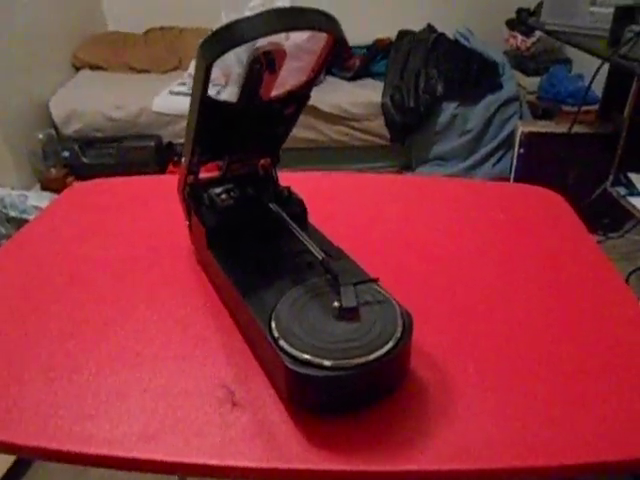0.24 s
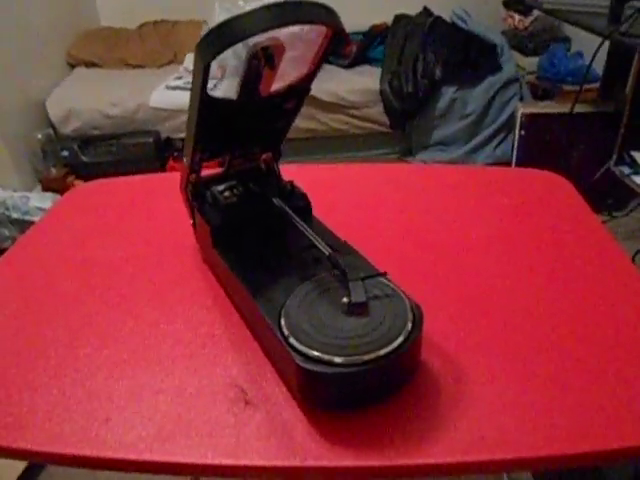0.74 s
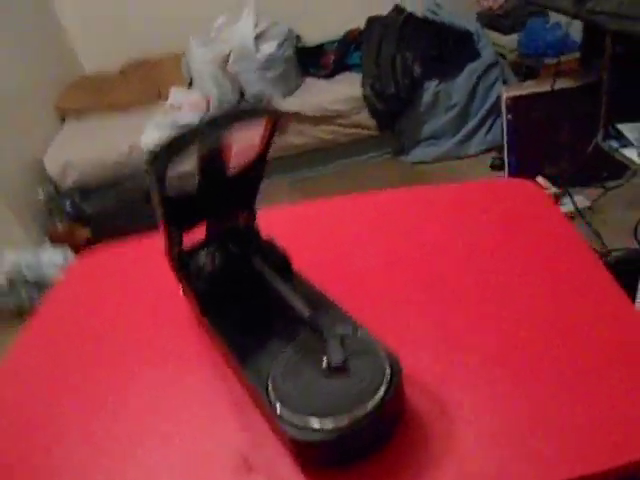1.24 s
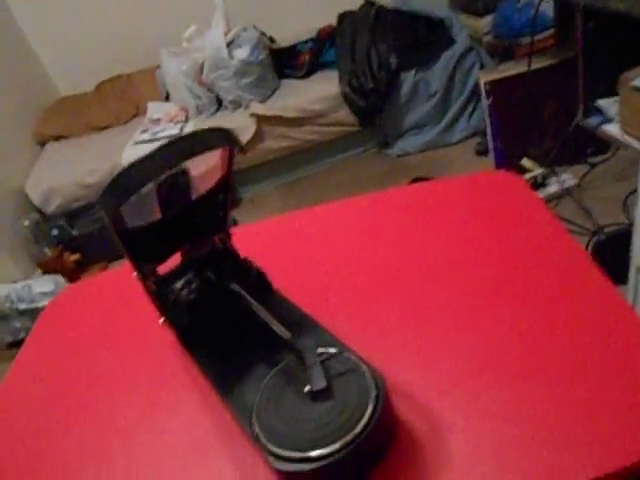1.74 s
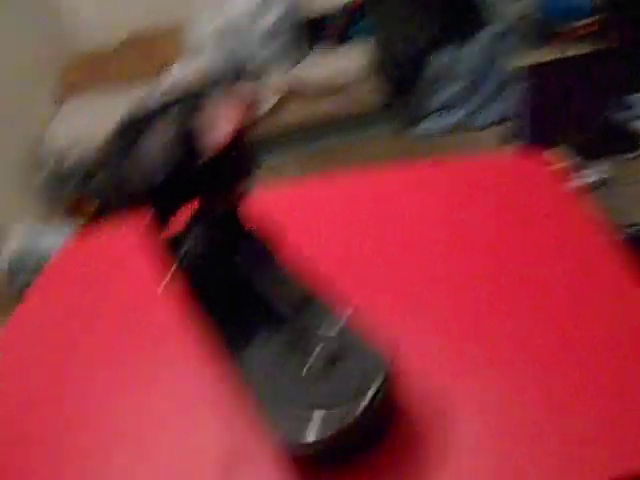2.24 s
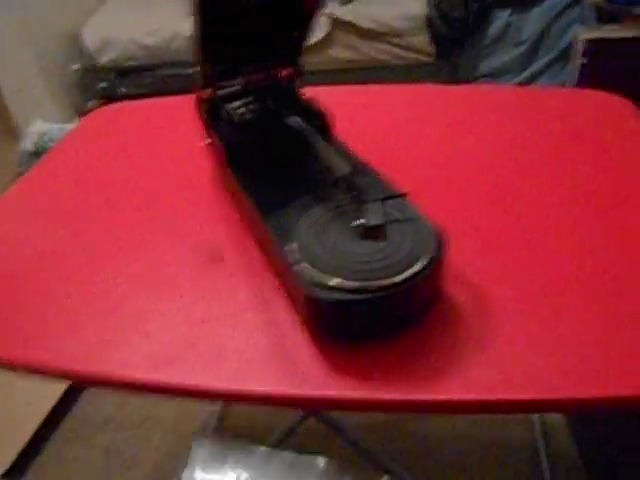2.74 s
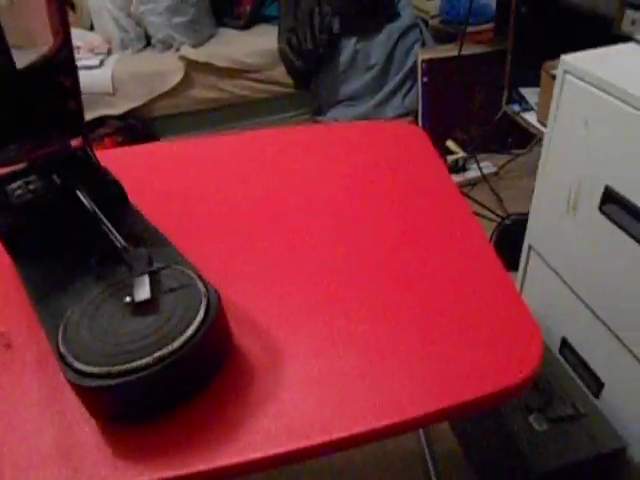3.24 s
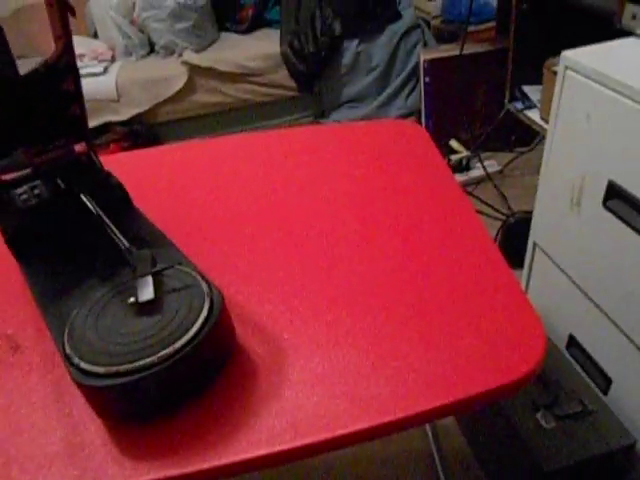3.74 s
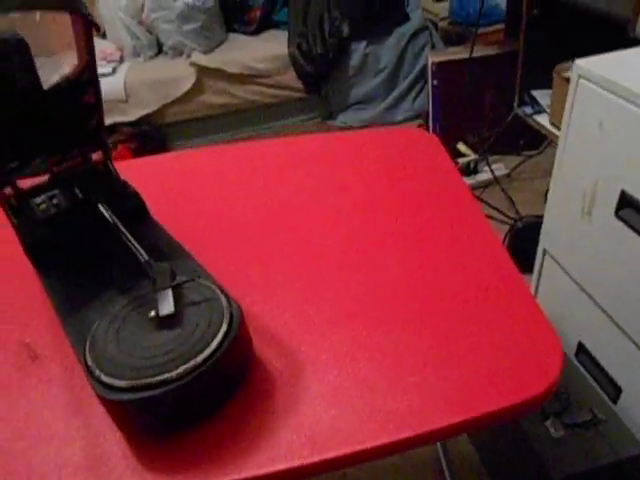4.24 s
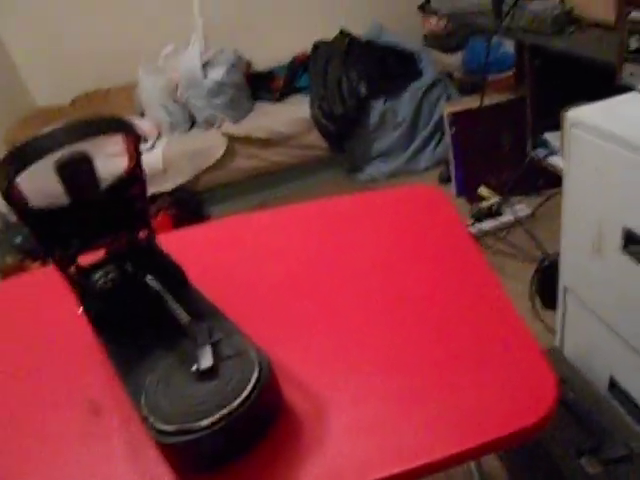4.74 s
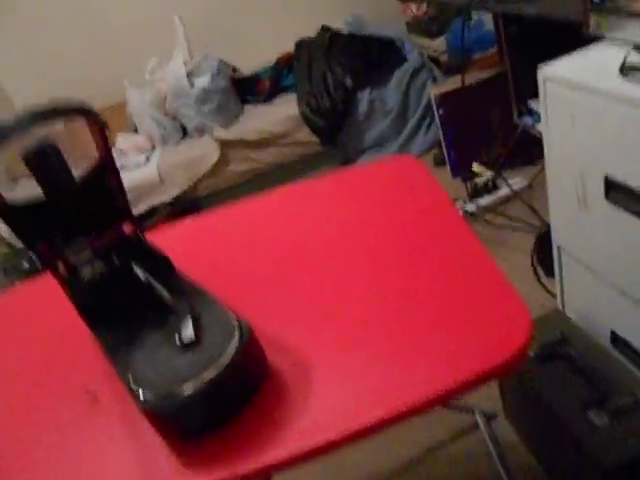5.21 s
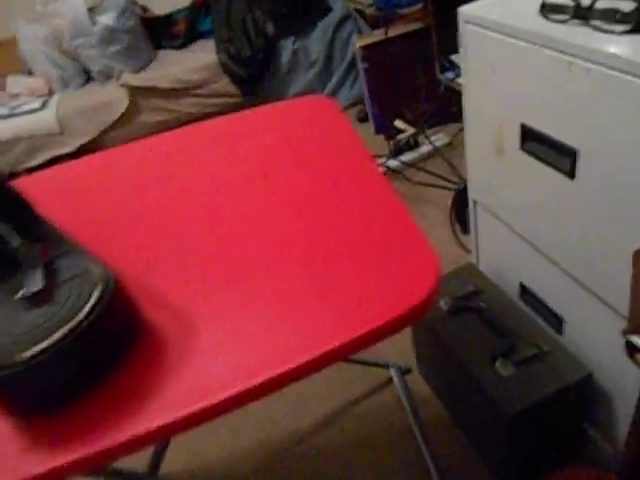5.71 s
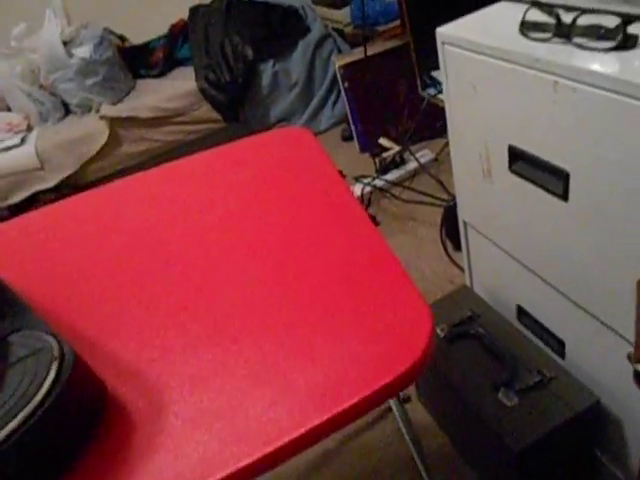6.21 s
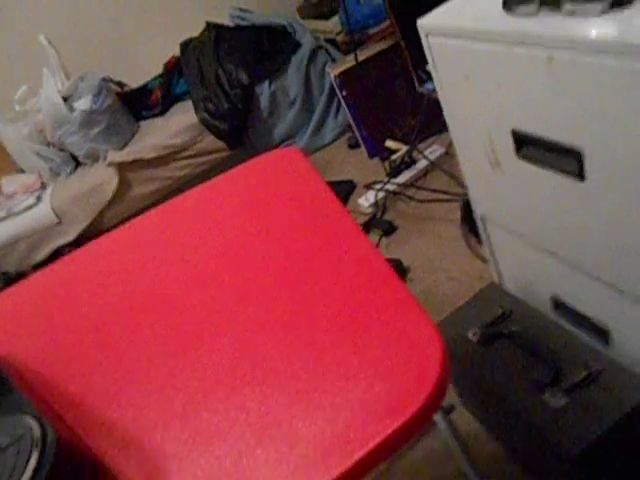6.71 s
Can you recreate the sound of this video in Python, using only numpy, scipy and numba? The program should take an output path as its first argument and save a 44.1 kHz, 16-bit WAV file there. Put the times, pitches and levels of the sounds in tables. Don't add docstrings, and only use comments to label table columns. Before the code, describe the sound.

Dry papery rubbing and crease ticks, a sharp burst of hollow table knocks, then a long swelling swish and scattered bumps in a hissy room.

```python
import sys
import numpy as np
from scipy import signal
from scipy.fft import rfft, irfft, next_fast_len
from scipy.io import wavfile
from scipy.ndimage import uniform_filter1d
from numba import njit

SR = 44100
rng = np.random.default_rng(int(sys.argv[2]) if len(sys.argv) > 2 else 0)


def nominal_scale(level):
    x = np.asarray(level, float) / 20
    return 10 ** x


def persist_wave(psi):
    counts = np.round(np.clip(psi, -1, 1) * 32767).astype(np.int16)
    wavfile.write(sys.argv[1], SR, np.atleast_2d(counts).T)


N = 307377
TIME = np.arange(N) / SR
SLOW = TIME[::32]


def unit(x):
    return x / np.sqrt(np.mean(x ** 2))


def noise():
    return rng.standard_normal(N)


def fade(t, t60):
    return nominal_scale(-60 * t / t60)


def colour(x, points):
    hz, db = np.transpose(points)
    size = next_fast_len(len(x))
    log_hz = np.log(np.arange(1, size // 2 + 2) * SR / size)
    gain = nominal_scale(np.interp(log_hz, np.log(hz), db))
    return irfft(rfft(x, size) * gain, size)[:len(x)]


def band(x, lo_hz, hi_hz):
    edges_hz = [lo_hz, min(hi_hz, SR / 2.2)]
    return signal.sosfilt(signal.butter(2, edges_hz, "band", fs=SR, output="sos"), x)


@njit
def hollow(x, hz, share):
    out, band_state, low_state = np.empty(len(x)), 0., 0.
    for i in range(len(x)):
        g = np.tan(np.pi * hz[i] / SR)
        v = (band_state + g * (x[i] - low_state)) / (1 + g * (g + share))
        band_state = 2 * v - band_state
        low_state = low_state + 2 * g * v
        out[i] = share * v
    return out


def walk(rate):
    hold = int(len(SLOW) / TIME[-1] / rate)
    held = rng.standard_normal(N // 64)[np.arange(len(SLOW)) // hold]
    smooth = uniform_filter1d(uniform_filter1d(held, hold), hold)
    return np.interp(TIME, SLOW, unit(smooth))


def ring(modes):
    t = TIME[:SR // 2]
    y = sum(nominal_scale(db - 60 * t / t60) * np.sin(2 * np.pi * hz * t) for hz, db, t60 in modes)
    return y / np.abs(y).max()


def rattle(lo_hz, hi_hz, t60):
    t = TIME[:SR // 2]
    return unit(band(rng.standard_normal(len(t)), lo_hz, hi_hz)) * fade(t, t60)


def fibres(share, scatter_db):
    slips = rng.random(N) < share
    size_db = scatter_db * np.minimum(rng.exponential(size=N), 4.)
    return slips * rng.standard_normal(N) * nominal_scale(size_db)


def strike(s, db, body):
    blows = np.zeros(N)
    blows[(np.asarray(s) * SR).astype(int)] = nominal_scale(np.asarray(db))
    return signal.oaconvolve(blows, body)[:N]


def taps(table, t60, snap_db, snap_t60, top_hz):
    out, t = np.zeros(N + 4096), TIME[:4096]
    grits = rng.standard_normal((len(table), len(t)))
    for (s, db, hz), grit in zip(table, grits):
        tone = np.sin(2 * np.pi * hz * t) * fade(t, t60)
        snap = grit * (fade(t, snap_t60) + nominal_scale(-18 - 60 * t / 0.038))
        click = nominal_scale(snap_db) * band(snap, hz / 3.5, min(3.2 * hz, top_hz))
        out[int(s * SR):][:len(t)] += nominal_scale(db) * (tone + click)
    return out[:N]


def peak(s, rise_s, fall_s, rise_db, bend):
    before = np.maximum(s - SLOW, 0) / rise_s
    after = np.maximum(SLOW - s, 0) / fall_s
    return nominal_scale(np.maximum(-rise_db * before ** bend - 20 * after, -120))


# pitch_hz [Hz], level_db [dB]
ROOM_HISS = [(47, -39), (80, -8.5), (120, 2.5), (330, -11.5), (561, -1.5), (787, -2), (1650, -7),
             (2420, -6.5), (4100, -10), (8080, -10.5), (10200, -13), (11800, -14.5), (12600, -48.5),
             (16400, -79), (22000, -120)]
# pitch_hz [Hz], level_db [dB]
MAINS_HUM = [(118.4, -60), (237, -64.5)]
# time_s [s], gain_db [dB]
CAMERA_GAIN = [(0, 2), (.08, -2), (.11, 3), (1.13, 5.5), (1.2, -3), (1.3, 2), (1.8, 5.5), (2.3, 1.5),
               (2.6, 4.5), (2.66, 2), (2.72, -2), (2.76, 3), (3.08, 0.5), (3.32, 1.5), (4.3, 5), (4.65, 4),
               (4.735, 1), (4.77, 4), (5.22, 2.5), (5.25, 0), (5.34, -.5), (5.4, 3), (5.6, 6.5),
               (6.97, 3.5)]


def room():
    hiss = unit(colour(noise(), ROOM_HISS)) * nominal_scale(-52)
    hum = sum(nominal_scale(db + 1 + 0.6 * walk(1.893)) * np.sin(2 * np.pi * hz * TIME) for hz, db in MAINS_HUM)
    s, gain_db = np.transpose(CAMERA_GAIN)
    return (hiss + hum) * nominal_scale(np.interp(TIME, s, gain_db))


# peak_s [s], rumble_db [dB], thud_db [dB]
HAND_JOLTS = [(0.02, -45, -46), (0.23, -28, -31), (0.43, -37, -39.5), (0.68, -39, -47.5),
              (0.92, -41, -44.5), (1.14, -40, -48.5), (1.38, -43, -51), (1.55, -50, -41.5),
              (1.71, -40.5, -38), (2.52, -31, -43), (2.78, -34, -40), (2.95, -46.5, -53), (3.51, -31, -43),
              (3.69, -37, -41.5), (3.92, -41.5, -44.5), (4.07, -41, -45), (4.15, -42, -39),
              (4.21, -28, -33), (5.49, -39.5, -39.5), (6.49, -40, -42), (6.66, -41, -50),
              (6.85, -48.5, -47)]
# start_s [s], end_s [s], pitch_hz [Hz], first_db [dB], last_db [dB]
HUM_SPELLS = [
    (4.9, 5.4, 31, -45.5, -52),
    (5.55, 6.5, 37, -47, -44),
    (1.4, 2.78, 171, -60, -49),
]
# start_s [s], level_db [dB], pitch_hz [Hz]
CAMERA_LURCHES = [
    (2.755, -19, 36),
    (2.515, -22, 110),
    (3.51, -21, 62),
    (2.77, -27, 105),
    (2.83, -31, 120),
]


def grip():
    shake, squeeze = nominal_scale(-56), nominal_scale(-56)
    for s, rumble_db, thud_db in HAND_JOLTS:
        jolt = peak(s, 0.0833, 0.1099, 20.25, 0.9)
        shake = shake + jolt * nominal_scale(rumble_db)
        squeeze = squeeze + jolt * nominal_scale(thud_db)
    rumble = unit(band(noise(), 11.5, 56)) * np.interp(TIME, SLOW, shake) * nominal_scale(1.11 * walk(12))
    thud = unit(band(fibres(.02, 1.85), 98, 493)) * np.interp(TIME, SLOW, squeeze) * nominal_scale(2.47 * walk(25))
    sway = unit(band(noise(), 4, 19)) * nominal_scale(-47 + 3.4 * walk(3))
    drone = 0
    for start_s, end_s, hz, first_db, last_db in HUM_SPELLS:
        level = nominal_scale(np.interp(TIME, [start_s, end_s], [first_db, last_db]))
        spell = uniform_filter1d((TIME > start_s) * (TIME < end_s) * level, size=6000)
        tone = np.sin(2 * np.pi * np.cumsum(hz + 2.5 * walk(8)) / SR)
        drone = drone + np.sqrt(2) * spell * nominal_scale(2.5 * walk(14)) * tone
    return rumble + thud + sway + drone + taps(CAMERA_LURCHES, 0.13, -40, 0.03, 1800)


def afterring():
    s, blow_db, panel_db, _ = np.transpose(TABLE_KNOCKS)
    hit_db = blow_db + panel_db
    t = TIME[:SR // 2]
    crack = unit(band(noise(), 1500, 4200)) * strike(s, hit_db - 25, fade(t, .06))
    wash = unit(colour(noise(), [(200, -12), (700, 0), (2000, -1), (4000, -10), (10000, -16)]))
    wash = wash * strike(s, hit_db - 31, fade(t, .36) * (1 - np.exp(-t / .006)))
    song_s, song_db = np.transpose(FRAME_SONGS)
    shimmer = unit(band(noise(), 6900, 8000))
    shimmer = shimmer * strike(song_s, song_db - 9, fade(t, .25) * (1 - np.exp(-t / .012)))
    return crack + wash + shimmer


# start_s [s], blow_db [dB], panel_db [dB re blow], edge_db [dB re blow]
TABLE_KNOCKS = [(0.886, -10, -1, -5), (2.409, -29, 3, -17.5), (2.496, -22, 1, -12), (2.5076, -12, 3, 5),
                (2.5195, -6.5, -17.5, -13.5), (2.533, -12, -22, 2), (2.5435, -14, -28, -18),
                (2.552, -13, -28, -18), (2.573, -20, -25, -18), (2.59, -24, -22, -18), (3.128, -17, 3, -11),
                (3.152, -19.5, -0.5, -11), (3.169, -25, 2, -14), (3.183, -24, 2, -16),
                (3.1965, -23, 1, -14), (3.214, -26, 0, -20), (3.267, -36, 4, -8), (3.234, -20, -2, -17.5),
                (3.474, -19, -6, -19), (3.502, -25.5, -8, -8), (3.682, -23.5, -0.5, -15.5),
                (4.294, -22.5, 2, -4.5), (4.745, -19.5, 4.5, -15), (5.365, -21, 1.5, -22),
                (5.673, -18.5, -1, -12.5), (5.698, -20, 0, -22.5), (5.727, -18, -0.5, -25.5),
                (6.079, -14, 4, -14.5), (6.117, -16.5, 2, -12), (6.195, -14.5, 2, -25),
                (6.954, -19.5, 0, -10.5)]
# start_s [s], level_db [dB]
FRAME_SONGS = [
    (3.128, -28.5),
    (4.746, -27),
    (5.366, -40.5),
    (6.079, -36),
    (6.196, -36),
]
# pitch_hz [Hz], level_db [dB], t60_s [s]
BOARD_TONES = [(237.1, 7.5, 0.0645), (290, -2, 0.107), (181.6, -12, 0.081), (447, -5, 0.0247)]
PANEL_TONES = [(584, 12.5, 0.046), (669, 0, 0.199), (739, 8, 0.0533), (846, 7.5, 0.0685),
               (1064.4, 1, 0.169), (1172.3, 2.5, .1), (2015, -15.5, 0.074)]
STEEL_TONES = [(7106, 0, .5), (7198, -4, .35), (7241, -3, .3), (7456, -1, .2), (7610, -3, .12),
               (7900, -6, .12), (4850, -8, .12), (8600, -8, .1), (6450, -8, .12)]
THOCK_TONES = [(660, 0, .03), (960, -2, .03), (1270, -5, .028), (1620, -9, .024), (2150, -9, .022)]


def knocks():
    s, blow_db, panel_db, edge_db = np.transpose(TABLE_KNOCKS)
    hit_db = blow_db + panel_db
    t = TIME[:SR // 2]
    push = 1 - np.exp(-t / 0.000965)
    board = strike(s, blow_db, push * (ring(BOARD_TONES) + nominal_scale(-21) * rattle(138.5, 380, 0.123)))
    panel_rattle = band(rattle(500, 1300, 0.09), 400, 1400)
    panel = strike(s, hit_db, nominal_scale(-2.5) * push * (ring(PANEL_TONES) + nominal_scale(-24) * panel_rattle))
    slap = unit(band(noise(), 900, 2400)) * strike(s, hit_db - 17, push * fade(t, .09))
    thock = strike(s, hit_db + .7, push * ring(THOCK_TONES))
    edge = unit(band(noise(), 2190, 6500)) * strike(s, blow_db + edge_db - 10, fade(t, .0195))
    loose = unit(colour(fibres(.2, 2.14), [(150, -3), (600, 2), (1200, -3.5), (2500, -16), (9000, -21)]))
    tail = loose * strike(s, blow_db - 19 + 0.7 * panel_db, push * fade(t, 0.255))
    steel = strike(*np.transpose(FRAME_SONGS), ring(STEEL_TONES) * (1 - np.exp(-t / 0.0088)))
    return band(board + panel + thock + slap + edge + tail + steel, 103.3, 11800)


# start_s [s], level_db [dB], pitch_hz [Hz]
FINGER_PATS = [(0.216, -22, 800), (0.227, -14.5, 519), (2.521, -13, 380), (0.331, -22, 1307),
               (.243, -19, 1100), (1.133, -25, 800), (1.397, -30, 433), (1.548, -26, 500),
               (1.693, -25.5, 559), (2.143, -29, 551), (2.65, -38, 762), (2.779, -27, 349),
               (2.82, -29, 668), (3.756, -27.5, 701), (4.179, -35, 706), (4.225, -15, 533),
               (4.255, -22, 665), (4.17, -24, 1550), (2.412, -24, 340), (2.427, -26, 330),
               (2.144, -33, 1020), (1.567, -33, 720), (1.708, -30, 600), (4.313, -30, 587),
               (4.295, -22, 700), (5.483, -26, 620), (5.491, -19, 650), (5.51, -28, 720), (5.385, -29, 792),
               (5.42, -31.5, 896), (2.41, -30.5, 598.5), (4.79, -33, 695), (4.83, -35, 792),
               (6.486, -28, 420), (6.495, -29, 480), (6.455, -33, 700), (3.49, -27, 1050),
               (6.862, -36, 550), (3.341, -33, 900), (3.444, -31, 450), (6.822, -34, 330)]


def pats():
    return taps(FINGER_PATS, 0.0396, 2.12, 0.0362, 1740)


# start_s [s], level_db [dB], pitch_hz [Hz]
PAPER_FLECKS = [(2.5078, -9, 8600), (.225, -13, 6000), (.129, -20, 10500), (.4478, -17, 7000),
                (6.117, -27, 8000), (3.1495, -30, 6400), (.327, -21, 6500), (.2415, -13, 8500),
                (.186, -17, 9000), (.157, -21, 8500), (.6429, -19, 8560), (1.045, -15, 4800),
                (2.552, -22, 9500), (2.563, -22, 8000), (2.6045, -23, 9810), (2.707, -37, 9000),
                (2.7621, -27, 8450), (2.797, -25, 4520), (2.8315, -27, 6000), (2.848, -26, 7500),
                (2.8769, -29, 9810), (3.2105, -32, 5000), (3.258, -33, 4100), (3.3388, -35, 8630),
                (3.5778, -30, 9620), (3.585, -33, 9500), (4.5291, -34, 9560), (4.864, -36, 9500),
                (4.965, -37, 5000), (5.09, -36, 9500), (5.1332, -33, 6000), (5.1627, -31, 5000),
                (5.206, -37, 8000), (5.226, -37, 9000), (5.279, -39, 6000), (5.5413, -33, 8000),
                (5.6161, -35, 5450), (5.667, -29, 8000), (5.7418, -31, 4770), (6.15, -32, 8500),
                (6.17, -33, 8500), (6.184, -31, 9000), (6.222, -33, 7500), (6.4423, -30, 4450),
                (6.513, -26, 3000)]


def flecks():
    return taps(PAPER_FLECKS, .003, 0., .003, 11000)


# start_s [s], level_db [dB], pitch_hz [Hz]
CREASE_TICKS = [(0.0155, -9, 2610), (0.2407, -9, 4300), (0.3252, -12, 2240), (0.4243, -7, 7550),
                (0.4472, -10, 1950), (1.1335, -14, 6500), (0.5278, -18, 2490), (0.5511, -18, 3010),
                (1.0246, -17, 5080), (1.0384, -14, 4350), (1.0527, -11, 5130), (1.0776, -16, 3730),
                (1.131, -4.5, 4755), (1.4267, -19.5, 6980), (1.548, -20, 2400), (1.6545, -13, 9000),
                (2.5083, 2, 3258), (2.535, -12, 3350), (2.563, -28, 5600), (2.5964, -28, 4320),
                (2.6045, -27, 4500), (2.8108, -27, 5400), (3.1276, -22.5, 3300), (3.5775, -32.5, 8070),
                (3.743, -31.5, 1900), (4.2233, -15, 8750), (4.371, -30, 2340), (5.658, -31, 7800),
                (5.761, -25, 8930), (6.795, -32.5, 4540)]


def creases():
    return taps(CREASE_TICKS, 0.00521, -2.05, 0.00336, 11500)


# start_s [s], level_db [dB], centre_hz [Hz], length_s [s], width
EDGE_SKIDS = [(0.539, -17.5, 2950, 0.0138, 1), (2.508, -1, 3400, 0.006, 0.25),
              (0.165, -14.5, 3110, 0.0635, 0.323), (2.52, -19.5, 3800, 0.0354, 0.326),
              (2.5744, -38, 2960, 0.016, 0.72), (2.67, -24.5, 7800, 0.011, 0.35),
              (2.748, -28, 8200, 0.03, 0.5), (2.792, -25, 4700, 0.0206, 0.84),
              (2.832, -24, 7400, 0.022, .25), (2.899, -34, 6650, 0.0188, 0.8),
              (4.5494, -36, 5550, 0.028, 0.59), (5.3587, -30.5, 1570, 0.0634, 1),
              (5.4814, -19.5, 2340, 0.021, 1), (5.535, -27, 3500, 0.04, 1), (5.483, -23, 6500, .016, .5),
              (.777, -14, 4800, .035, .15), (.725, -22, 7200, .04, .3), (1.036, -12, 4600, .022, .2),
              (2.41, -27, 7200, .055, .15), (.18, -15, 4200, .03, .12), (3.4, -33, 8000, .04, .4),
              (5.36, -33, 7000, .07, .5), (.633, -14, 1716, 0.0106, 0.1), (.634, -8, 3243, 0.012, 0.09),
              (.641, -8, 4300, 0.008, 0.07), (.329, -19, 1300, .008, .6), (1.008, -24, 8000, .03, .3),
              (5.765, -30, 8600, .11, .22), (.526, -22, 1500, .012, .7), (6.518, -22, 4300, .045, .2),
              (4.75, -33, 3500, .06, .6), (6.085, -32, 8000, .07, .2), (.19, -16, 2800, .025, .1),
              (.14, -17, 2500, .025, .1), (.1, -22, 2900, .02, .2), (1.146, -26, 5500, .012, .2),
                  (3.139, -27, 4200, .022, .7), (3.395, -37, 1230, .05, .15), (3.39, -41, 2450, .05, .12),
                  (3.485, -34, 2600, .02, .5), (3.76, -30, 1170, .3, .07), (3.8, -33, 1930, .25, .05),
                  (5.305, -37, 2500, .045, .2), (5.37, -33, 4200, .055, .5), (5.55, -29, 4300, .022, .3),
                  (6.088, -33, 4300, .05, .4), (6.2, -36, 4300, .05, .4), (6.502, -29, 4100, .006, .2),
                  (2.498, -22, 2300, .005, .7), (6.513, -21, 1500, .03, .4),
                  (1.583, -11, 5587, 0.018, 0.02)]


def skids():
    out, grit = np.zeros(N), fibres(.2, 3)
    for s, db, hz, length_s, width in EDGE_SKIDS:
        a = int(s * SR)
        t = TIME[:min(N - a, SR // 2)]
        rise = 1 - np.exp(-t / (.0012 + .15 * length_s))
        shape = rise / (1 + (t / length_s) ** 3.45)
        rub = unit(band(grit[a:a + len(t)], hz / (1 + width), hz * (1 + width)))
        out[a:a + len(t)] += nominal_scale(db - 12) * shape * rub
    return out


# peak_s [s], swell_s [s], fall_s [s per 20 dB], level_db [dB], pressure [0 light, 1
PAPER_STROKES = [(0.04, 0.07, 0.035, -30, 0.92), (.05, .01, .3, -43, .9), (1.12, .02, .04, -33, -.2),
                 (0.328, 0.0248, 0.1829, -31.5, 0.75), (0.4, 0.093, 0.2077, -31, 0.7),
                 (0.54, 0.0228, 0.08, -36, 0.81), (0.602, 0.061, 0.24, -33.5, 0.15),
                 (0.641, 0.0193, 0.0572, -23.5, .35), (0.798, 0.084, 0.16, -25.5, 0.13),
                 (0.903, 0.031, 0.0028, -37, 1), (0.958, 0.0494, 0.083, -26, 0.2),
                 (1.058, 0.05, 0.035, -20, 0.08), (1.145, .012, .15, -39, 0),
                 (2.418, 0.0375, .12, -46, -.7), (2.459, 0.044, .04, -46, -.7),
                 (3.362, 0.0374, 0.32, -44, .9), (3.508, 0.098, 0.23, -49.5, 0.67),
                 (3.696, 0.119, .1, -40.5, 0.89), (5.1, .12, .5, -52, .7), (5.763, .02, .3, -43, 0.4),
                 (5.829, 0.072, .5, -45, 0.43), (6.445, 0.008, 0.07, -42, 0.74),
                 (6.722, 0.13, 1.5, -42, 0.5), (6.953, 0.0106, 0.5, -42, 0.98)]
# time_s [s], level_db [dB], pressure [0 light, 1 firm, may exceed 1], speed [0-1]
FIRST_SCRAPE = [
    (0.096, -36, .95, .1),
    (0.103, -31, 0.917, 0),
    (0.17, -28.5, 0.801, 0),
    (0.24, -22.5, 0.905, 0.14),
    (0.262, -29, 0.83, 0.18),
    (0.29, -33, 0.75, 0.26),
    (0.322, -35, .75, .3),
]
LONG_PULL = [
    (1.2, -45.5, 0.28, 0.65),
    (1.31, -35, 0.41, 0.33),
    (1.564, -32, 0.42, 0.91),
    (1.584, -28, 0.34, 0.55),
    (1.678, -29, 0.35, 0.68),
    (1.732, -42.5, 0.78, .6),
    (1.82, -57.5, 0.74, 0.68),
]
LONG_SWISH = [
    (3.74, -45, 0.87, 0.82),
    (3.782, -33.5, 0.71, 0.544),
    (3.888, -25, 0.541, 0.41),
    (4.02, -23.5, 0.69, 0.307),
    (4.13, -20, 0.612, 0.594),
    (4.222, -17.5, 0.66, 0.97),
    (4.29, -49.5, 1.05, .8),
    (4.34, -65, 0.83, .5),
]
TABLE_SHOVE = [
    (6.47, -62, 1.5, 0),
    (6.509, -54, 1.5, 0),
    (6.512, -36, .9, 0),
    (6.537, -35, .85, 0),
    (6.565, -37, .8, .05),
    (6.592, -49, .7, .1),
]


def rubbing():
    parts = []
    for s, rise_s, fall_s, db, press in PAPER_STROKES:
        gain = (SLOW > s - rise_s) * nominal_scale(db) * peak(s, rise_s, fall_s, 14.5, 1.292)
        speed = 0.554 - 0.3934 * press
        parts.append((gain, press, speed))
    for move in (FIRST_SCRAPE, LONG_PULL, LONG_SWISH, TABLE_SHOVE):
        s, *columns = np.transpose(move)
        db, press, speed = (np.interp(SLOW, s, c) for c in columns)
        parts.append((nominal_scale(db) * (SLOW > s[0]) * (SLOW < s[-1]), press, speed))
    power = sum(gain ** 2 for gain, _, _ in parts) + 1e-12
    press = sum(gain ** 2 * p for gain, p, _ in parts) / power
    speed = sum(gain ** 2 * v for gain, _, v in parts) / power
    controls = (np.sqrt(power), press, speed)
    return [np.interp(TIME, SLOW, uniform_filter1d(c, size=6)) for c in controls]


# pitch_hz [Hz], level_db [dB per Hz]
PAPER_COLOUR = [(1290, -27.5), (2200, -8.5), (3580, -4.5), (3990, -1), (4720, -4), (5540, -0.5),
                (6400, -1.5), (9550, -1), (10500, -4.5), (12000, -3.5), (12500, -45.5), (16200, -61),
                (22000, -120)]
CARD_COLOUR = [(210, -39.5), (350, -11.5), (520, -0.5), (772, 2.5), (845, -0.5), (941, 4), (1180, 3.5),
               (3000, -2), (3900, -14), (6600, -120)]


def slide():
    rub, press, speed = rubbing()
    card_db = -26.5 + 30.5 * press
    gap_hz = 3300 + 2890 * speed
    top_db = -10 + 14 * speed
    paper = colour(fibres(.35, 1.78), PAPER_COLOUR)
    out = unit(hollow(paper, gap_hz, 0.119)) * nominal_scale(-16.0)
    for hz in 2000 * 2 ** np.arange(0, 2.8, .4):
        tilt_db = 1.6 * np.clip(top_db + 3.5, -6, 4) * np.log2(hz / 5800)
        patch = hollow(paper / paper.std(), np.full(N, hz), 0.2348)
        out = out + patch * nominal_scale(tilt_db + 1.83 * walk(27))
    card = unit(colour(fibres(.3, 1.54), CARD_COLOUR)) * nominal_scale(card_db + 1.86 * walk(45))
    return rub * nominal_scale(-3.5 + 1.9 * walk(90)) * (out + card)


def scene():
    near = slide() + creases() + pats() + skids()
    echo = signal.oaconvolve(near, rattle(360, 8200, 0.234))[:N] * nominal_scale(-50)
    return (room() + grip() + afterring() + knocks() + flecks() + echo + near)[None]


def band_limit(x):
    return signal.sosfilt(signal.butter(12, 16500, fs=SR, output="sos"), x)


def record(dry):
    rounded = 1.1 * np.tanh(1.12 * dry[0])
    shelf = colour(rounded, [(1, -6.5), (10300, 0.5), (11200, -17.5), (12300, -14.0), (12800, -50), (22050, -60)])
    clipped = np.clip(shelf, -.73, .73)
    flat = colour(clipped, [(1, 0), (12400, 0), (13000, -15), (16000, -21), (16500, -70), (22050, -90)])
    return band_limit(flat[None])


dry = scene()
out = record(dry)
persist_wave(out)
```